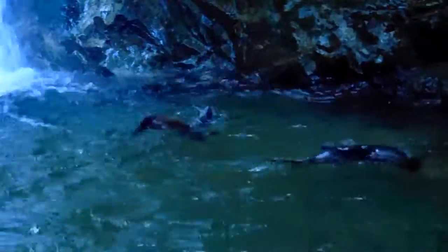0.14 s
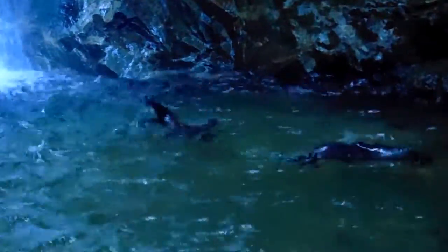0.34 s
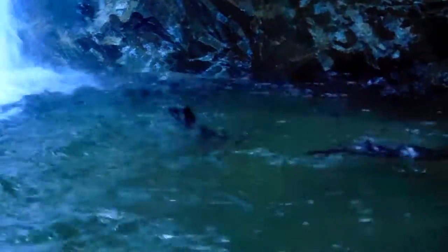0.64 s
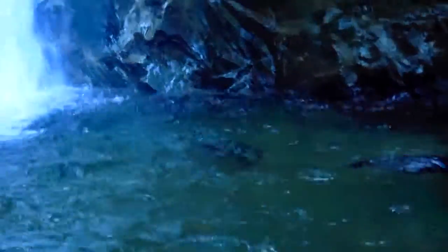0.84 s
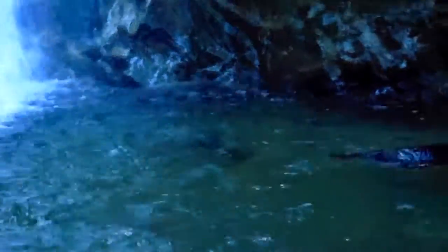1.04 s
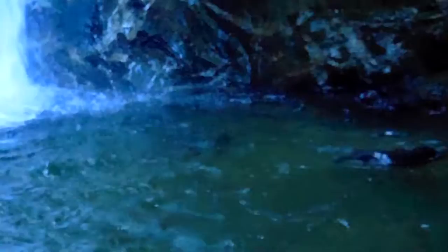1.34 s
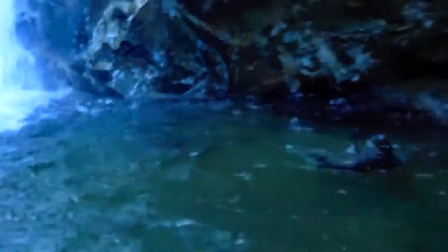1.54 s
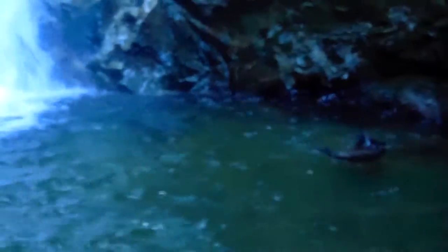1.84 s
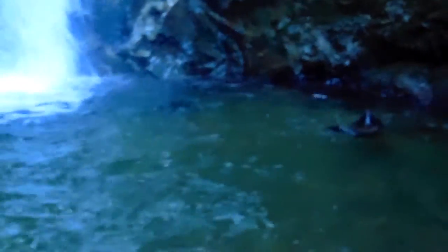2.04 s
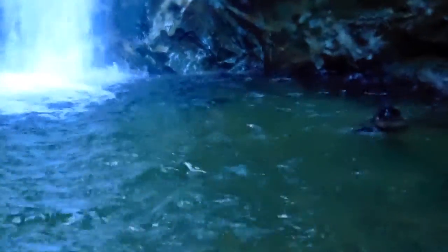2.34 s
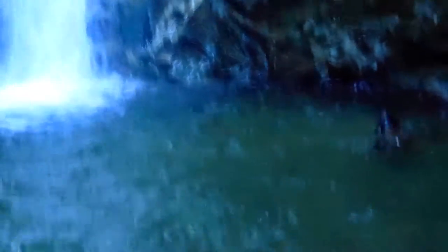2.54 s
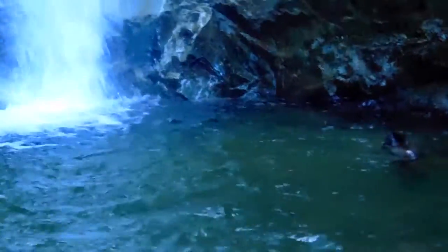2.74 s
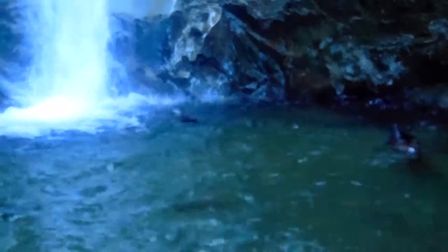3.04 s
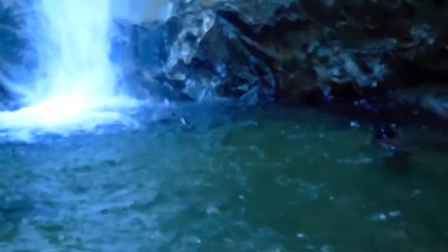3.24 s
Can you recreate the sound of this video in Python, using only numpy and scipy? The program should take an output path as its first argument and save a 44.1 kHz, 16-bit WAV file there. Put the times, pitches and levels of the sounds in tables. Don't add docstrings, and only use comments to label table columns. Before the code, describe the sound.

Dense, wide waterfall rush from start to end, dipping slightly in the middle and swelling after two seconds, with faint watery gulps, tiny plops and low wind thumps on a nearby stereo microphone outdoors.

```python
import sys
import numpy as np
from scipy import signal
from scipy.fft import rfft, irfft, next_fast_len
from scipy.io import wavfile

SR = 44100
rng = np.random.default_rng(int(sys.argv[2]) if len(sys.argv) > 2 else 0)


def natural_amplitude(level_db):
    exponent = np.asarray(level_db, float) / 20
    return 10 ** exponent


def dump(signal):
    limited = np.clip(np.atleast_2d(signal).T, -1, 1)
    pcm = np.round(limited * 32767).astype(np.int16)
    wavfile.write(sys.argv[1], SR, pcm)


N = 149499


def rms_one(x):
    return x / np.sqrt(np.mean(x ** 2) + 1e-20)


def at_hz(points, hz):
    table_hz, values = np.transpose(points)
    return np.interp(np.log(hz + 1), np.log(table_hz), values)


def drift(rate):
    r = np.exp(-80 * np.pi * rate / SR)
    slow = signal.lfilter([1], [1, -2 * r, r * r], rng.standard_normal(N // 40 + 2002))[2000:]
    return np.interp(np.arange(N) / 40, np.arange(len(slow)), rms_one(slow - slow.mean()))


def low(x, hz, order):
    return signal.sosfilt(signal.butter(order, hz, fs=SR, output="sos"), x)


def rush(spectrum, shared_db, near_db, own_db, rate):
    size = next_fast_len(N)
    hz = np.arange(size // 2 + 1) * SR / size
    tone = rfft(rng.standard_normal((2, size))) * natural_amplitude(at_hz(spectrum, hz))
    tone = tone * (hz > spectrum[0][0] * .7)
    place = 2.5 * np.log2(np.maximum(hz, 40) / 40)
    shared = drift(12.6)
    near = [drift(9.9) for _ in range(9)]
    out = 0
    for k in range(23):
        share = np.clip(1 - np.abs(place - k), 0, 1)
        surge = shared_db * shared + near_db * near[k // 3] + own_db * drift(rate)
        out = out + natural_amplitude(surge) * irfft(tone * share, size)[:, :N]
    return rms_one(out)


def spray(flow):
    # (frequency [Hz], density [dB per Hz])
    hiss = [(1060, -55), (1800, -6.5), (3070, -1.5), (5950, -3), (11500, 1), (13300, -1.5), (15000, -9),
            (15700, -11)]
    return natural_amplitude(flow + 2.0) * rush(hiss, shared_db=0.18, near_db=0.11, own_db=0.81, rate=15.0)


def roar(eased):
    # (frequency [Hz], density [dB per Hz])
    churn = [(20, -15), (60, -12), (130, -6), (250, -8), (500, -4), (900, 0.5), (1500, 4), (2600, -7.5)]
    level_db = -10.5
    return natural_amplitude(eased + level_db + 2.0) * rush(churn, shared_db=0.96, near_db=.5, own_db=0.2, rate=17.0)


def bubbles():
    births_per_s, ring_cycles = 2500, 11
    strength = natural_amplitude(2.9 * np.minimum(rng.exponential(1, (2, N)), 5))
    kicks = strength * rng.choice([-1, 1], (2, N))
    born = rng.random((2, N)) < births_per_s * natural_amplitude(3.0 * drift(6.0)) / SR
    dealt = rng.integers(0, 24, (2, N))
    out = 0
    for k, hz in enumerate(np.geomspace(250, 5000, 24)):
        r = natural_amplitude(-60 * hz / ring_cycles / SR)
        w = 2 * np.pi * hz / SR
        hits = kicks * born * (dealt == k) + 1e-18
        ring = signal.lfilter([0, np.sin(w)], [1, -2 * r * np.cos(w), r * r], hits)
        out = out + (hz / 1000) ** 0.36 * ring
    return rms_one(out)


def ports(common, apart):
    # (frequency [Hz], left-right likeness [0-1])
    likeness = [(1230, 1), (1700, .9), (2200, 0.89), (3300, 0.4), (6000, 0.48), (7400, 0.7), (12500, 0.66),
                (15500, 0.18)]
    # (frequency [Hz], left lead [rad])
    lead = [(2300, 0), (3900, 0.86), (6700, 0.3), (8700, 0.99), (10300, 0.98), (13000, 0.86), (15700, .4)]
    # (frequency [Hz], left-right level [dB])
    tilt = [(2310, -1), (2700, -1.3), (4600, 2.5), (6200, 1.5), (7800, -1.1), (11000, -1.7), (13500, -1),
            (15700, 5)]
    # (frequency [Hz], width [Hz], boost [dB])
    hollows = [(248, 57, 4.5), (695, 170, 3.5)]
    mirror_s, mirror_gain, mirror_hz = 0.001993, -0.13, 1420
    bass_hz, bass_alike = 1230, .9997
    size = next_fast_len(N)
    hz = np.arange(size // 2 + 1) * SR / size
    bounce = np.exp(-2j * np.pi * hz * mirror_s) / (1 + (hz / mirror_hz) ** 4)
    boost_db = sum(db / (1 + (2 * (hz - at) / width) ** 2) for at, width, db in hollows)
    place = (1 + mirror_gain * bounce) * natural_amplitude(boost_db)
    alike = np.where(hz < bass_hz, bass_alike, np.clip(at_hz(likeness, hz), 0, 1))
    mid = np.sqrt((1 + alike) / 2) * rfft(common, size)
    side = np.sqrt((1 - alike) / 2) * rfft(apart, size)
    skew = np.exp(.5j * at_hz(lead, hz)) * natural_amplitude(at_hz(tilt, hz) / 2)
    skew = np.where(hz < bass_hz, 1, skew)
    return irfft(place * np.array([(mid + side) * skew, (mid - side) / skew]), size)[:, :N]


def gulps():
    # (time [s], peak level [dB], pitch [Hz], length [s])
    big_bubbles = [
        (0.145, -28.5, 270, .04),
        (0.243, -25, 760, 0.024),
        (0.379, -29, 718, 0.023),
        (2.093, -28, 735, 0.029),
        (2.352, -26.5, 728, 0.028),
        (2.375, -27, 1323, 0.024),
        (2.587, -30.5, 238, 0.025),
    ]
    rise = 0.065
    out = np.zeros(N)
    for s, db, hz, length in big_bubbles:
        u = np.arange(int(length * 1.5 * SR)) / SR / length
        swell = np.sin(np.pi * u / 1.5) ** 2
        ring = np.sin(2 * np.pi * hz * length * u * (1 + rise * (u - 1)))
        i = int(s * SR)
        out[i:i + len(u)] += natural_amplitude(db) * swell * ring
    return out


def plops(count):
    level_db, low_hz, high_hz, length_s = -47, 430, 1300, 0.028
    out = np.zeros((2, N + SR))
    t = np.arange(int(length_s * SR)) / SR
    swell = np.sin(np.pi * t / length_s) ** 2
    for when, pitch, side, size, *cluster in rng.random((count, 7)):
        spread = 1 + .15 * (np.array(cluster)[:, None] - .5)
        hz = low_hz * (high_hz / low_hz) ** pitch * spread
        rings = np.sin(2 * np.pi * hz * t).sum(axis=0)
        i = int(when * N)
        out[int(side * 2), i:i + len(t)] += natural_amplitude(level_db + 5.0 * size) * swell * rings
    return out[:, :N]


def breeze():
    # (time [s], level [dB])
    strength = [(0, -50), (.2, -45), (.65, -40), (.78, -51), (1.1, -47), (1.25, -53), (1.55, -47),
                (1.9, -57), (2.15, -46), (2.6, -44), (3.05, -47), (3.2, -61), (3.39, -54)]
    base_db = np.interp(np.arange(N) / SR, *np.transpose(strength))

    def one_port():
        level = natural_amplitude(base_db + 4.5 * drift(7.8))
        return level * rms_one(low(rng.standard_normal(N), 87.5, order=4))
    return np.array([one_port(), one_port()])


def wind():
    # (time [s], peak level [dB], left-right level [dB], length [s], buffet frequency [Hz])
    puffs = [(0.113, -35, -10, .12, 40), (0.32, -16.5, 12, 0.077, 62), (.4, -27, 3, 0.042, 50),
             (0.536, -25, -39, 0.074, 62), (0.593, -36, -7, .07, 30), (0.838, -30.5, 0, 0.054, 35),
             (0.961, -29, 5, 0.1, 55), (1.028, -22, 15, 0.067, 75), (1.143, -24, 17, 0.028, 60),
             (1.51, -28, 24, 0.061, 45), (1.725, -28, 15, 0.047, 45.4), (2.163, -36, 5, .06, 35),
             (2.363, -27, -9, 0.069, 40), (2.738, -37, -11, .05, 35), (2.989, -30, 14, 0.053, 30)]
    attack, roughness, rough_top_hz = .2, .45, 160
    t = np.arange(N) / SR
    out = breeze()
    rough = roughness * rms_one(low(rng.standard_normal((2, N)), rough_top_hz, order=4))
    phases = rng.uniform(0, 2 * np.pi, (len(puffs), 2))
    for (s, db, pan_db, length, hz), phase in zip(puffs, phases):
        span = slice(int(s * SR), int((s + 3 * length) * SR))
        u = (t[span] - s) / length
        onset = np.sin(np.pi / 2 * np.clip(u / attack, 0, 1)) ** 2
        shape = onset * np.exp(-2.0 * np.maximum(u - attack, 0) ** 2)
        swing = np.sin(2 * np.pi * hz * length * u + phase[:, None]) + rough[:, span]
        port_db = db + np.minimum([[pan_db], [-pan_db]], 0)
        out[:, span] += natural_amplitude(port_db) * shape * swing
    return low(out, 240, order=6)


def scene():
    # (time [s], level [dB])
    fall = [(0, -15), (.45, -14.5), (.76, -14.5), (1.14, -15), (1.2, -17.5), (1.3, -16), (1.8, -17),
            (2.03, -16.5), (2.06, -15), (2.3, -13.5), (2.43, -15), (2.5, -15), (2.87, -14.5), (2.89, -16),
            (2.98, -16.5), (3.1, -16), (3.25, -16.5), (3.39, -16)]
    flow = np.interp(np.arange(N) / SR, *np.transpose(fall))
    eased = flow.mean() + 0.88 * (flow - flow.mean())
    water = spray(flow) + roar(eased) + natural_amplitude(eased - 22) * bubbles()
    common, apart = water
    return ports(common, apart) + gulps() + wind() + plops(count=40)


def roll_off(x):
    return signal.sosfilt(signal.butter(12, 16010, fs=SR, output="sos"), x)


def record(dry):
    size = next_fast_len(N)
    kept = np.arange(size // 2 + 1) * SR / size < 15730
    rounded = 1.097 * np.tanh(dry / 1.114)
    mix = irfft(rfft(rounded, size) * kept, size)[:, :N]
    return roll_off(mix)


dry = scene()
out = record(dry)
dump(out)
```